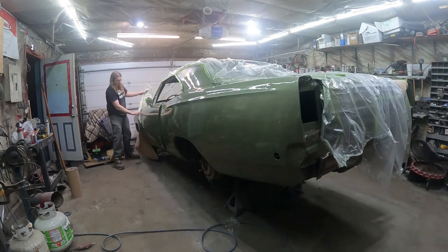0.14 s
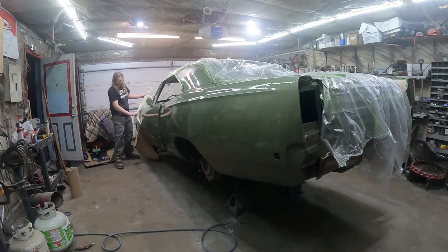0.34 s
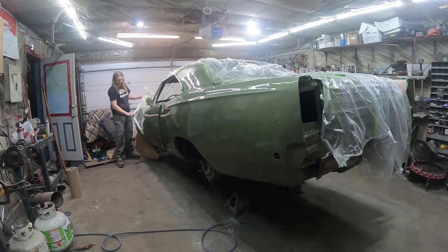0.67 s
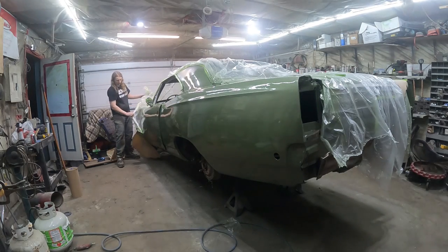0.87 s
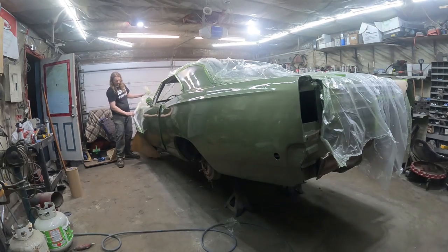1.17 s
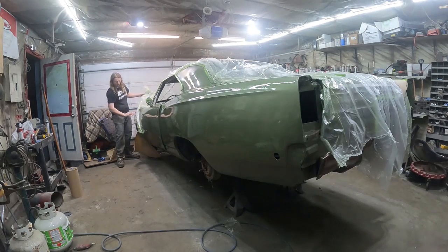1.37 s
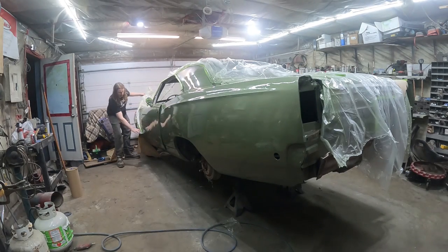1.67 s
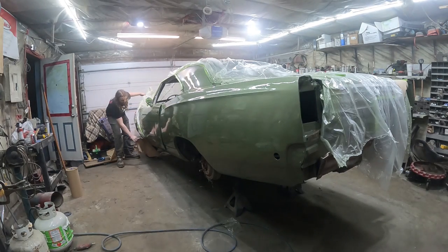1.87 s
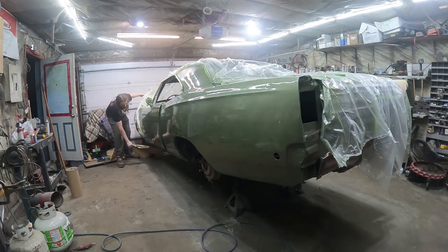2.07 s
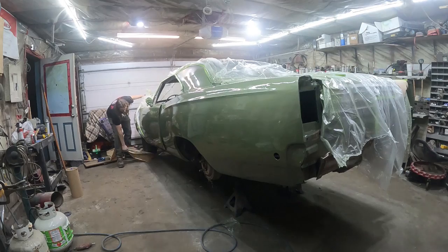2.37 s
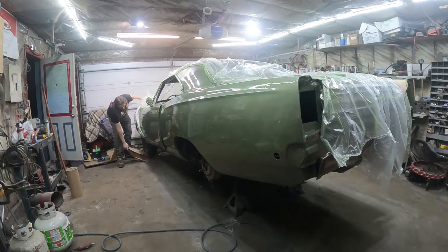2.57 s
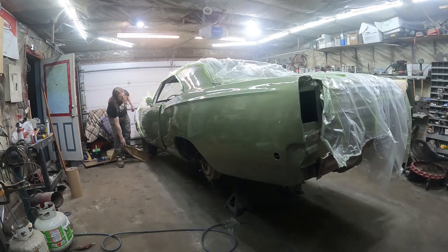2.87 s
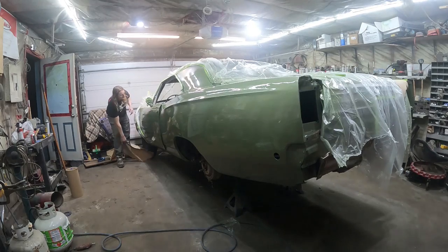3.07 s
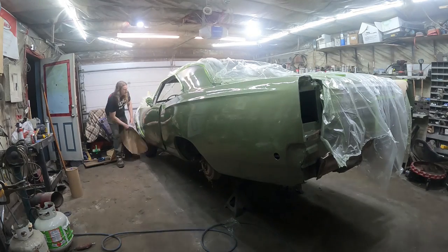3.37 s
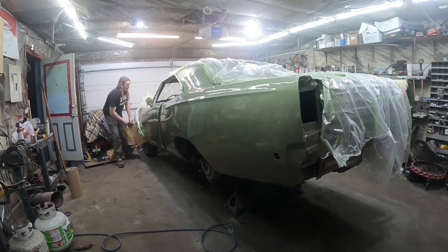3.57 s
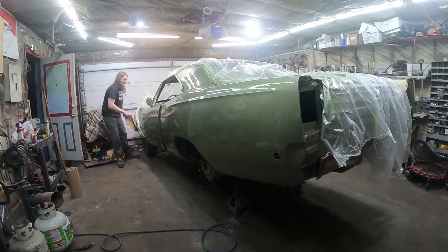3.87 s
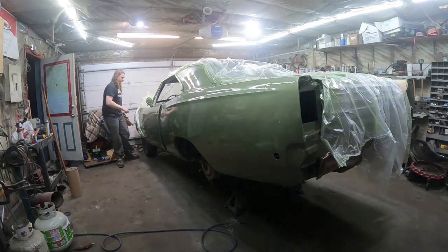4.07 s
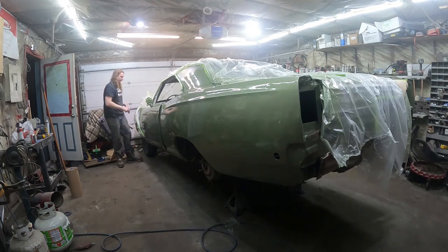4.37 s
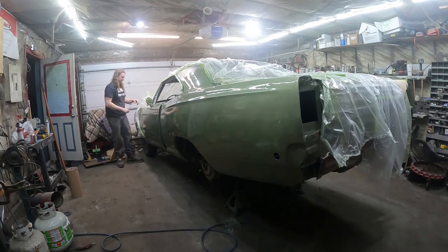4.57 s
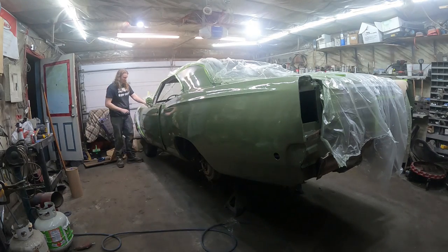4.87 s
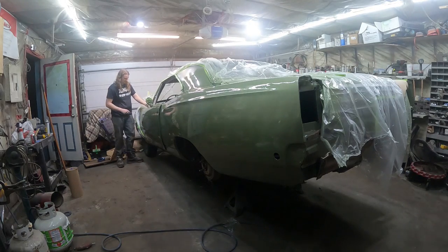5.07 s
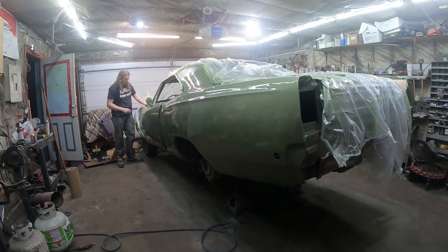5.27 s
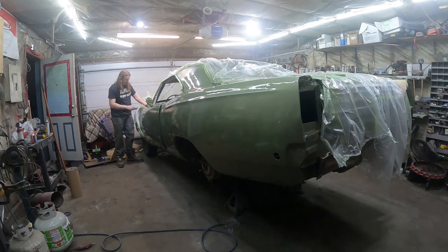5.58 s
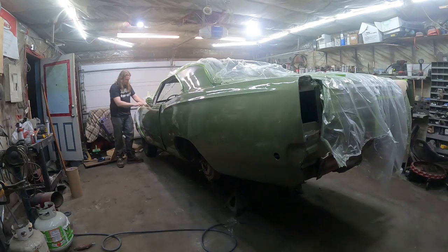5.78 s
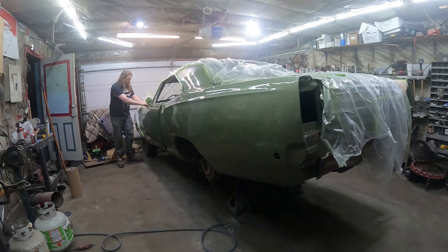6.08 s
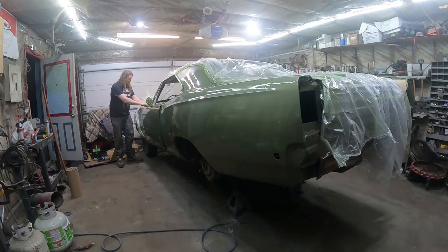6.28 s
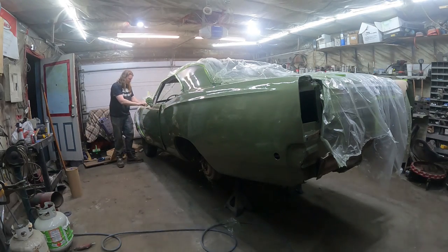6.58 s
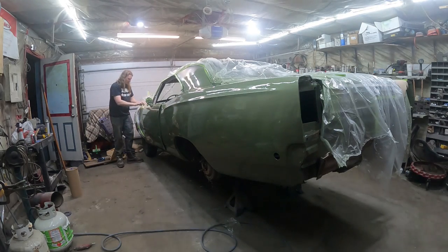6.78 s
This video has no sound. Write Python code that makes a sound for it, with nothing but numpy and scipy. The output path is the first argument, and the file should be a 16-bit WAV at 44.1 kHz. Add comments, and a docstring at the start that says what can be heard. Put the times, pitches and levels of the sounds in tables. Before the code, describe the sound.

Crinkling plastic and paper snap and rustle as masking comes off a car, busiest in the first four seconds, then fading to near quiet.

```python
"""Masking tape, paper and plastic sheet are pulled off a car body in a garage.
Each pull is a swarm of random buckling clicks; creases snap and the sheet rustles on in the hands between pulls.
Tape rings by stick-slip as it lets go; the taut sheet and panel thud and murmur as damped resonances.
Scattered echoes and a decaying tail answer the sheet and tape, over a faint hiss and a swelling low rumble."""
import sys
import numpy as np
from scipy import signal
from scipy.fft import rfft, irfft, next_fast_len
from scipy.io import wavfile
from scipy.ndimage import uniform_filter1d

SR = 44100
rng = np.random.default_rng(int(sys.argv[2]) if len(sys.argv) > 2 else 0)


def file_out(sig):
    """Save sig as 16-bit WAV at sys.argv[1]."""
    # one column per channel
    cols = np.atleast_2d(sig).T
    # limit, then scale
    lim = np.clip(cols, -1, 1)
    pcm = np.round(lim * 32767).astype(np.int16)
    wavfile.write(sys.argv[1], SR, pcm)


N = 306054
TIME = np.arange(N) / SR


def undb(db):
    """Amplitude law: decibels to gain."""
    return 10 ** (np.asarray(db) / 20)


def unit(x):
    """Power normalisation: scale to rms 1."""
    return x / np.sqrt(np.mean(x ** 2) + 1e-20)


def along(points, hz):
    """Logarithmic pitch scale: read (f/Hz, value) points at the frequencies hz."""
    f, value = np.transpose(points)
    return np.interp(np.log(hz + 1), np.log(f), value)


def shape(x, gain):
    """Linear filtering: multiply the spectrum by a gain that is a function of frequency."""
    size = next_fast_len(len(x) + 2048)
    hz = np.arange(size // 2 + 1) * SR / size
    return irfft(rfft(x, size) * gain(hz), size)[:len(x)]


def causal(db, size=4096):
    """Minimum phase by cepstral folding: a sharp-fronted response with the spectrum db(f)."""
    hz = np.arange(size // 2 + 1) * SR / size
    cepstrum = irfft(np.log(undb(db(hz))))
    cepstrum[1:size // 2] *= 2
    cepstrum[size // 2 + 1:] = 0
    return irfft(np.exp(rfft(cepstrum)))


def ring(x, hz, width_hz):
    """Simple resonance: a two-pole peak of the given bandwidth."""
    return signal.lfilter(*signal.iirpeak(hz, hz / width_hz, fs=SR), x)


def fade(t, t60):
    """Exponential decay: fall by 60 dB in t60 seconds."""
    return undb(-60 * t / t60)


def add(out, start, x):
    """Superposition: mix x in from the time start in seconds."""
    i = max(int(start * SR), 0)
    out[i:i + len(x)] += x[:max(N - i, 0)]


def walk(rate, count):
    """Interpolated noise: random wandering with rate knots per second and a spread near 1."""
    steps = np.arange(count) * rate / SR
    knots = rng.standard_normal(4096)
    return 1.2 * np.interp(steps, np.arange(len(knots)), knots)


# relative spectrum of the background: f/Hz, level/dB
AIR_SPECTRUM = [(15, -19.5), (29, -2), (45, -10), (62, -32.5), (85, -32.5), (130, -33.5), (180, -17.5),
                (260, -29), (700, -41), (1250, -30.5), (3000, -55.5), (7500, -45), (9500, -56.5),
                (12500, -50), (14500, -76)]
AIR_DB = -59  # level about which the background wavers


def air(waver_db=3.1, rumble_db=4):
    """Filtered noise: faint hiss of the building over a swelling rumble, the two sides most alike in the bass."""
    side_tilt = [(40, -11.5), (1200, 2.5), (5000, -6.5)]  # side against mid: f/Hz, level/dB
    mid = shape(rng.standard_normal(N), lambda hz: undb(along(AIR_SPECTRUM, hz)))
    side = shape(rng.standard_normal(N), lambda hz: undb(along(AIR_SPECTRUM, hz) + along(side_tilt, hz)))
    rumble = shape(mid, lambda hz: 1 / (1 + (hz / 60) ** 6))
    # the rumble is already in mid, so only its change in level is added
    swells = rumble * (undb(rumble_db * np.tanh(walk(13, N))) - 1)
    stereo = np.array([mid + side, mid - side]) + swells
    return stereo / np.std(mid) * undb(AIR_DB + waver_db * walk(4.6, N))


def crinkle(count, rate, scatter_db, clump_db, slide_db):
    """Random impulse process: buckling clicks of unequal size, in clumps, over the hiss of sliding sheet."""
    sizes = undb(scatter_db * np.minimum(rng.exponential(size=count), 3.5))
    happens = rng.random(count) < rate / SR
    clicks = happens * sizes * rng.choice([-1, 1], count)
    slide = undb(slide_db) * rng.standard_normal(count)
    return unit((unit(clicks) + slide) * undb(clump_db * walk(170, count)))


# loose sheet moving in the hands, before colouring: t/s, level/dB, brightness/dB
RUSTLE_COURSE = [(0.0, -58, 1.5), (0.25, -51, 11), (0.66, -35, -0.5), (0.85, -48, 2), (1.2, -58, 2),
                 (1.48, -51.5, 5.5), (1.8, -53, 2), (2.05, -33, -20.5), (2.6, -41.5, 3), (3.3, -44.5, -4),
                 (3.6, -42.5, -9), (4.33, -51.5, 8), (4.68, -50, -8), (4.93, -65, -14), (5.2, -44.5, -8.5),
                 (5.62, -62, -5), (5.901, -80, -12), (6.45, -73.5, 9), (6.76, -59.5, 4), (6.94, -60, -15)]


def rustle(body_db=-6.0):
    """Impulse noise with a moving spectrum: sparser crackle of the loose sheet, thin in the bass."""
    s, *columns = np.transpose(RUSTLE_COURSE)
    db, bright_db = (np.interp(TIME, s, column) for column in columns)
    grains = crinkle(N, rate=850, scatter_db=3.5, clump_db=4, slide_db=-1.0) * undb(db)
    low, mid, high = (shape(grains, lambda hz: 1 / (1 + (hz / edge) ** 4)) for edge in (850, 2700, 7000))
    bass = undb(body_db) * low
    middle = mid - low
    # half the brightness acts between the upper edges, all of it above
    treble = undb(bright_db / 2) * (high - mid)
    top = undb(bright_db) * (grains - high)
    return bass + middle + treble + top


def drumming(db=-54, follow=0.64, hz=180, width_hz=75, flutter_db=1.0, scuff_db=-9, scuff_hz=380):
    """Forced resonance: the flapping sheet keeps the panel murmuring, more when the rustle is busy."""
    s, rustle_db, _ = np.transpose(RUSTLE_COURSE)
    busy_db = np.interp(TIME, s, rustle_db) - rustle_db.max()
    drive = undb(follow * busy_db + flutter_db * walk(20, N))
    panel = unit(ring(ring(rng.standard_normal(N), hz, width_hz), hz, width_hz))
    scuff = unit(ring(ring(rng.standard_normal(N), scuff_hz, scuff_hz), scuff_hz, scuff_hz))
    return undb(db) * drive * (panel + undb(scuff_db) * scuff)


def crease(db, treble_db, gain_db=13, settle_s=0.0015, front=4):
    """Snap-through buckling: a crease flips with a click and runs along the sheet for a few milliseconds."""
    t = TIME[:1024]
    click = rng.standard_normal(len(t)) * np.exp(-t / settle_s)
    click[0] = front
    click = click / np.linalg.norm(click)
    colour = [(500, -5.0), (2000, -6.5), (8000, 1.0 + treble_db)]  # f/Hz, level/dB
    return undb(db + gain_db) * signal.fftconvolve(click, causal(lambda hz: along(colour, hz), size=512))


# rise of a tug or snap flurry (s), share of a draw spent swelling, time constant of the release (s)
TUG_RISE_S, DRAW_RISE_SHARE, RELEASE_S = 0.0023, 0.27, 0.014


def flurry(length, rise, db, body_db, bright_db, clicks_per_s=2800, crowding=.9):
    """Buckling under load: force swells, holds and releases; slack sheet sounds hollow, taut film bright."""
    t = TIME[:SR // 4]
    swell = np.minimum(t / max(rise, 3e-4), 1)
    force = swell * np.exp(-np.maximum(t - length, 0) / RELEASE_S)
    # a harder pull buckles more creases at once, until they merge into a swish; clicks_per_s holds at -36 dB
    rate = clicks_per_s * undb(crowding * (db + 36))
    grains = force * crinkle(len(t), rate, scatter_db=3.0, clump_db=2.0, slide_db=-5)
    grains = unit(grains) * np.sqrt(np.mean(force ** 2))
    # f/Hz, level/dB
    colour = [(180, .5 * body_db), (340, 1.08 * body_db), (700, 0.85 * body_db), (1200, .12 * body_db),
              (1900, 0.0018), (4500, bright_db / 2), (9000, bright_db)]
    return undb(db) * signal.fftconvolve(grains, causal(lambda hz: along(colour, hz), size=512))


# single creases, relative levels: t/s, click level/dB, treble/dB, level of the flurry that follows/dB
CREASE_SNAPS = [(0.046, -29.5, -3, -46), (0.1468, -26.5, -9, -51), (0.7106, -11.5, 6, -28.5),
                (0.906, -10, -2, -29.5), (1.2768, -29.5, 6.5, -46.5), (2.1274, -17, 9.5, -36),
                (2.39, -20, -3, -28.5), (2.494, -16, 0.5, -36), (2.6072, -13.5, -0.5, -36.5),
                (2.884, -20, -3, -42), (3.0568, -20.5, -4, -55), (3.0884, -16.5, -5.5, -32),
                (3.4914, -17, -1.5, -30), (3.744, -14.5, -9, -30), (3.868, -19, -12, -38),
                (4.3653, -22.5, -12, -31.5), (4.596, -21.5, -4, -35), (5.454, -42, -7.5, -43),
                (5.565, -35, -8.5, -39.5), (5.771, -48.5, 9, -71), (6.508, -33.5, -6, -53),
                (6.835, -38.5, 1, -48)]


def snaps(follow_s=0.0082, body_db=-14, bright_db=2):
    """Triggered buckling: a lone crease sets off a brief thin flurry of its neighbours."""
    out = np.zeros(N)
    for start, db, treble_db, follow_db in CREASE_SNAPS:
        add(out, start, crease(db, treble_db))
        add(out, start, flurry(follow_s, TUG_RISE_S, follow_db, body_db, treble_db + bright_db))
    return out


# dull thuds of the taut sheet, the panel and feet: t/s, relative level/dB, f/Hz
LOW_THUDS = [(0.223, -35.5, 212.5), (0.72, -28, 186), (0.746, -24, 179), (0.911, -31, 199),
             (0.948, -35, 194), (1.41, -42, 201), (1.503, -41, 180), (2.121, -34, 188), (3.621, -38, 203),
             (4.073, -38.5, 179), (4.126, -40, 230), (4.506, -42.5, 203), (4.6, -41, 190),
             (5.061, -49, 227), (6.16, -41, 197), (6.701, -46, 168)]


def thuds(contact_s=0.011, t60=0.17, knock_db=-8, knock_s=.022, puff_hz=42, puff_db=-14, puff_t60=0.22):
    """Damped mode: a soft push rings one drum-like mode, with a dull knock and a deep puff of displaced air."""
    out, t = np.zeros(N), TIME[:SR // 2]
    push = 1 - np.exp(-t / contact_s)
    for start, db, hz in LOW_THUDS:
        mode = np.sin(2 * np.pi * hz * t) * fade(t, t60)
        knock = unit(ring(ring(rng.standard_normal(len(t)), hz, hz), hz, hz)) * np.exp(-t / knock_s)
        puff = np.sin(2 * np.pi * puff_hz * t) * fade(t, puff_t60)
        add(out, start, undb(db) * push * (mode + undb(knock_db) * knock + undb(puff_db) * puff))
    return out


# sudden tugs that jerk the sheet taut, relative settings:
# t/s, length before release/s, level/dB, low-frequency body/dB, brightness/dB
SHEET_TUGS = [(0.704, 0.021, -21.5, -1.5, -9), (0.749, 0.021, -33.5, -1, 0), (0.907, 0.022, -25.5, -2, 9.5),
              (1.313, 0.031, -43, 1, 9.5), (1.372, 0.044, -34.5, 1.5, 7), (1.728, 0.025, -50, -1.5, 7.5),
              (1.913, 0.11, -32, 5, 0), (4.0665, 0.03, -31.5, -2.5, 1), (4.982, 0.063, -39.5, -1, 4),
              (6.148, 0.048, -57, 21, -1)]
# slower draws that swell as the sheet comes away: same columns
SHEET_DRAWS = [(0.494, 0.095, -38.5, 5.5, 5.5), (2.047, 0.089, -26.5, 4.5, -3), (2.186, 0.03, -29, -20, -4),
               (2.574, 0.039, -34, 4.5, -4), (2.836, 0.074, -36, 5, -0.5), (3.252, 0.051, -39.5, -2, -2),
               (3.377, 0.12, -36.5, 0, -0.5), (3.577, 0.091, -32.5, 2.5, 0.5), (3.669, 0.033, -28, 3, -2),
               (4.404, 0.04, -44.5, 2, 0.5), (4.508, 0.088, -46, -3, 5.5), (5.022, 0.035, -26, -4, -0.5),
               (5.301, 0.067, -55.5, 8.5, -15), (6.215, 0.035, -43.5, -4.5, -6),
               (6.578, 0.23, -55.5, 12, -2.5)]


def pulls(click_db=10, click_treble_db=-5):
    """Loading rate: a tug flips a crease and peaks almost at once; a draw swells over part of its length."""
    out = np.zeros(N)
    for start, length, db, *tone in SHEET_TUGS:
        add(out, start, crease(db + click_db, click_treble_db))
        add(out, start, flurry(length, TUG_RISE_S, db, *tone))
    for start, length, *sound in SHEET_DRAWS:
        add(out, start, flurry(length, DRAW_RISE_SHARE * length, *sound))
    return out


# tape running off the paint: t/s, length/s, relative level/dB, central slip rate/(1/s), strip resonance f/Hz
TAPE_PEELS = [(0.514, 0.11, -32.5, 550, 2270), (0.702, 0.023, -27.5, 336, 1110),
              (2.861, 0.03, -37.5, 264, 1980), (5.027, 0.0086, -40, 480, 1220),
              (5.315, 0.022, -48.5, 480, 1690)]


def peels(jitter=.4, width_hz=1000, scatter_db=-0.5):
    """Stick-slip: the glue holds and lets go unevenly and rings the stretched strip."""
    out, t = np.zeros(N), TIME[:SR // 4]
    for start, length, db, rate, hz in TAPE_PEELS:
        turns = np.cumsum(rate * np.exp(jitter * walk(400, len(t)))) / SR
        # one slip at each whole turn, of uneven size
        slips = np.diff(np.floor(turns), prepend=0) * undb(scatter_db * rng.standard_normal(len(t)))
        strip = unit(ring(ring(slips, hz, width_hz), hz, width_hz))
        arch = np.sqrt(np.abs(np.sin(np.pi * np.minimum(t / length, 1))))
        add(out, start, undb(db) * strip * arch)
    return out


def folds(x, depth_db=0.76, rate=28):
    """Changing facet size: as the sheet folds, each range of pitch waxes and wanes on its own."""
    centres = 500 * 2 ** (np.arange(11) / 2)  # half octaves from 500 Hz
    bands = (shape(x, lambda hz: along(np.c_[centres, pick], hz)) for pick in np.eye(len(centres)))
    return sum(band * undb(depth_db * walk(rate, N)) for band in bands)


# relative crinkle spectrum of the sheet: f/Hz, level/dB
SHEET_SPECTRUM = [(300, -12.5), (440, -10.5), (620, -9), (780, -6), (1100, -0.86), (1750, 0), (3000, -2),
                  (4800, -2.5), (7600, -8), (9300, -18.5), (12200, -23.5), (13800, -32.5), (15000, -48.5)]
# resonances of the car body and the space around it: f/Hz, width/Hz, change of level/dB
BODY_HOLLOWS = [(201.5, 21, 12), (570, 57, 5.5), (949, 15, 5), (1193, 21, -1.5)]


def radiate(clicks, bass_db=-15):
    """Radiation by convolution: every click takes the colour of the sheet and of the hollows beside it."""
    spectrum = [(40, -43.5), (90, -36.5), (170, bass_db)] + SHEET_SPECTRUM

    def colour(hz):
        hollows = sum(db / (1 + (2 * (hz - f) / width) ** 2) for f, width, db in BODY_HOLLOWS)
        return along(spectrum, hz) + hollows

    response = causal(colour)
    return signal.fftconvolve(clicks, response / np.linalg.norm(response))[:N]


def echoes(early_t60=0.32, late_t60=0.41, top_t60=0.35, early_db=-3., late_db=-7.0):
    """Reverberant decay: scattered reflections from floor and shelves, and a tail whose top dies sooner."""
    t = TIME[:32768]
    early = rng.standard_normal(len(t)) * (rng.random(len(t)) < .08) * fade(t, early_t60)
    noise = rng.standard_normal(len(t))
    low = shape(noise, lambda hz: 1 / (1 + (hz / 8000) ** 4))
    late = low * fade(t, late_t60) + (noise - low) * fade(t, top_t60)
    early = undb(early_db) * early / np.linalg.norm(early)
    late = undb(late_db) * late / np.linalg.norm(late)
    return (early + late) * (t > .001)


# level between the two microphone ports: f/Hz, left minus right/dB
PORT_TILT = [(200, -0.2), (500, 0), (1200, 2), (4400, 2), (8000, 2.5), (13000, 1)]
# phase between the ports: f/Hz, lead of the left/rad
PORT_LEAD = [(100, -0.087), (1000, -0.25), (3000, -0.51), (5000, -0.3), (8600, -0.95), (10000, 0.45)]
# side signal of the echoes: f/Hz, level/dB
ECHO_SPREAD = [(150, -11.5), (500, -11.5), (1000, -12), (4000, -6), (8000, -21), (12000, -4.5)]


def garage(x, direct_db=-5.0, count=6, size=400):
    """Room response by convolution: each spot on the sheet has its own echoes; two close ports hear the sum."""
    spot = np.repeat(rng.integers(count, size=N // size + 1), size)[:N]
    # the sound passes from spot to spot at constant power
    shares = uniform_filter1d(1. * (spot == np.arange(count)[:, None]), size)
    parts = x * shares / np.linalg.norm(shares, axis=0)
    mid, side = (sum(signal.fftconvolve(part, echoes())[:N] for part in parts) for _ in range(2))
    mid = mid + undb(direct_db) * x
    side = shape(side, lambda hz: undb(along(ECHO_SPREAD, hz)))

    def port(sign):
        # the ports differ a little in level and phase, half the difference each
        def gain(hz):
            return undb(sign * along(PORT_TILT, hz) / 2) * np.exp(.5j * sign * along(PORT_LEAD, hz))
        return shape(mid + sign * side, gain)

    return np.array([port(1), port(-1)])


def scene():
    """Superposition of sources: the masking comes off in the garage."""
    sheet = radiate(folds(pulls() + rustle()) + snaps())
    return garage(sheet + peels()) + thuds() + drumming() + air()


def record(dry, top_hz=15000):
    """Band limiting: the recorder cuts the top with a steep zero-phase low-pass."""
    return signal.sosfiltfilt(signal.ellip(8, .1, 60, top_hz, fs=SR, output="sos"), dry)


dry = scene()
out = record(dry)
file_out(out)
```